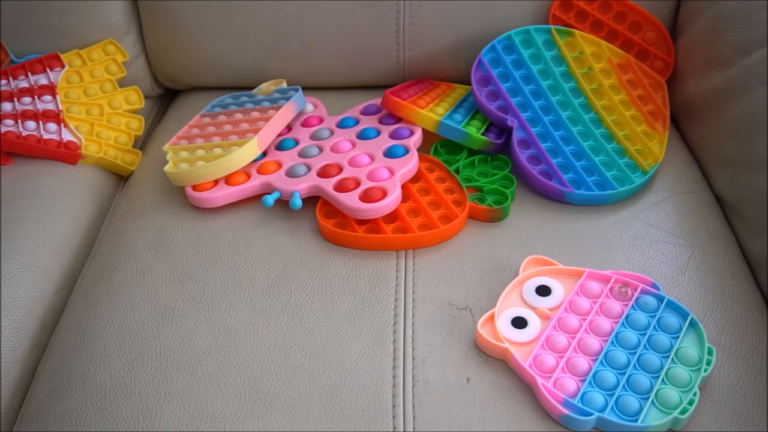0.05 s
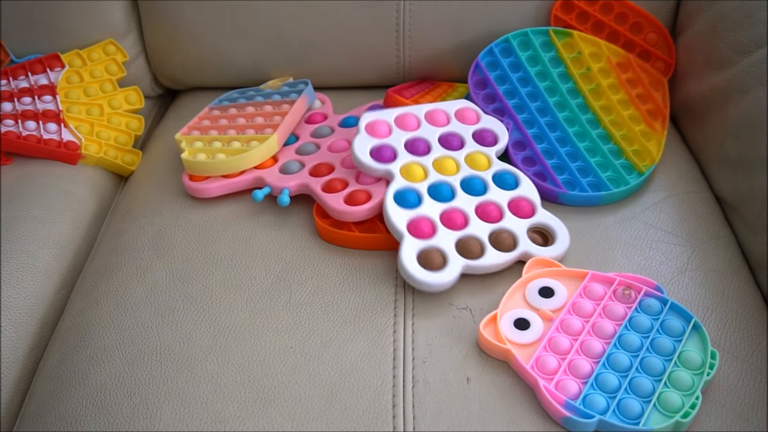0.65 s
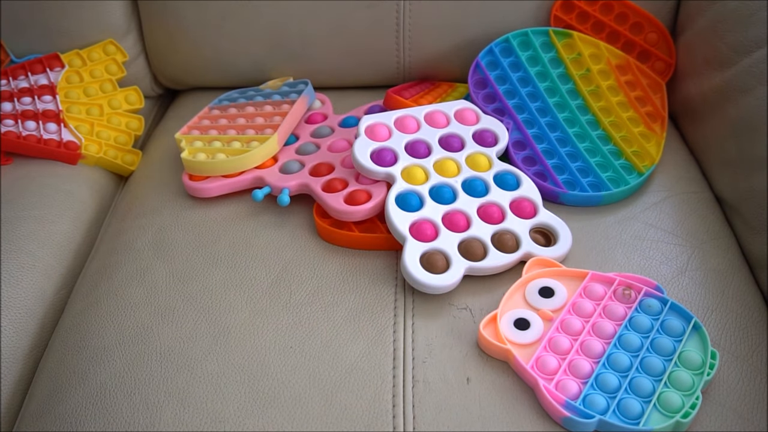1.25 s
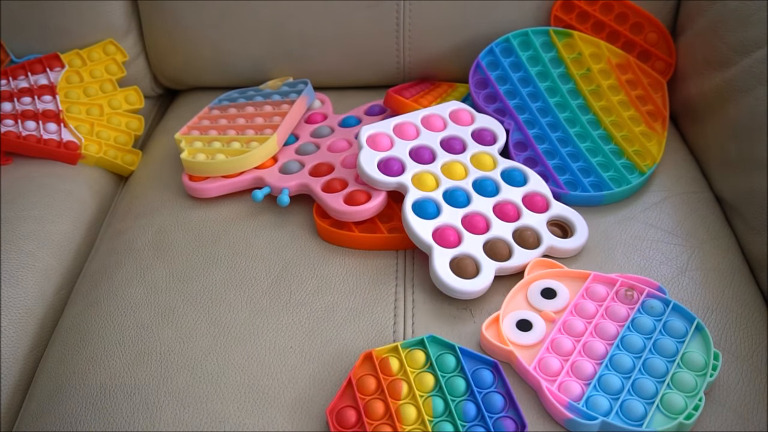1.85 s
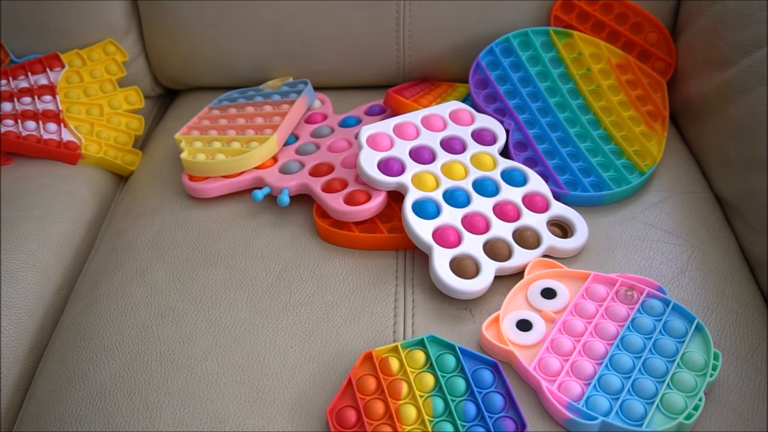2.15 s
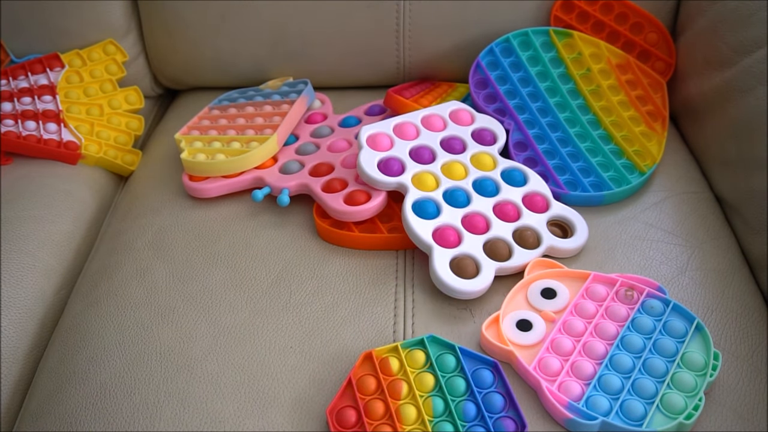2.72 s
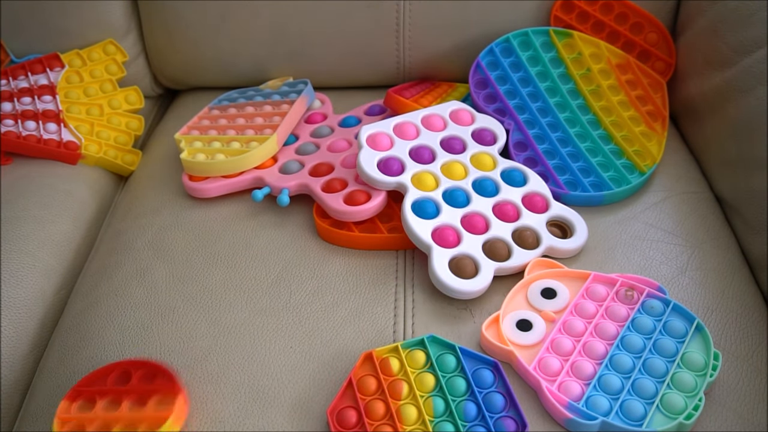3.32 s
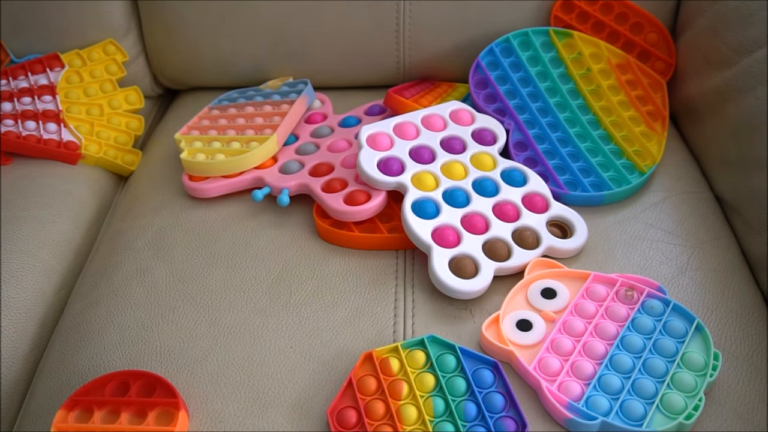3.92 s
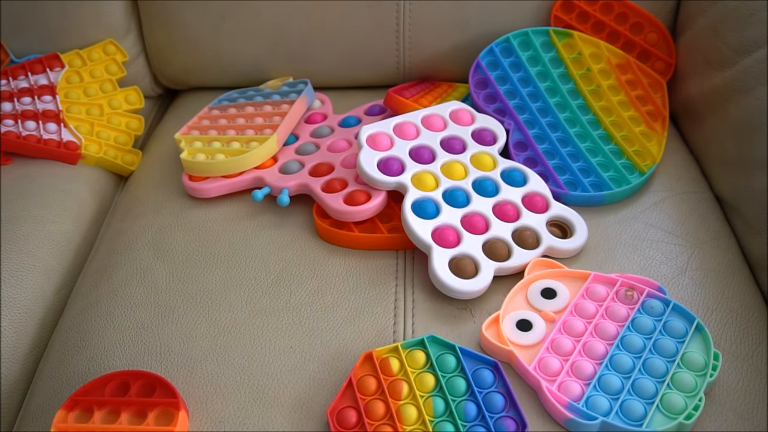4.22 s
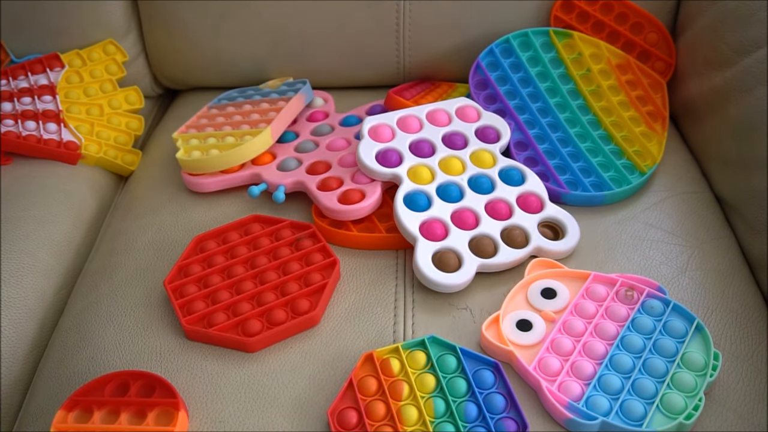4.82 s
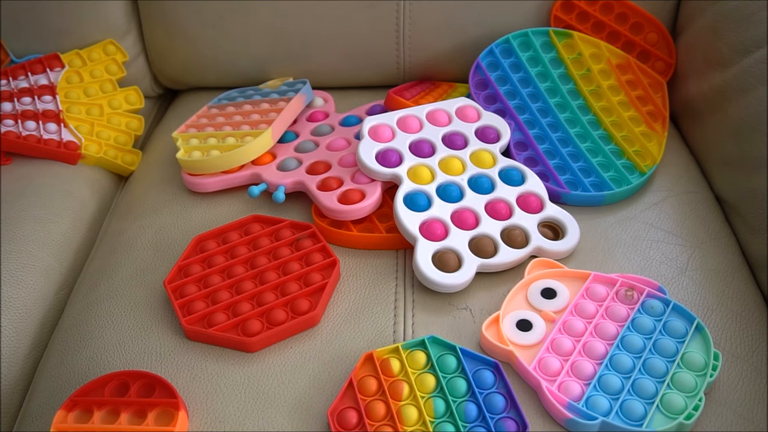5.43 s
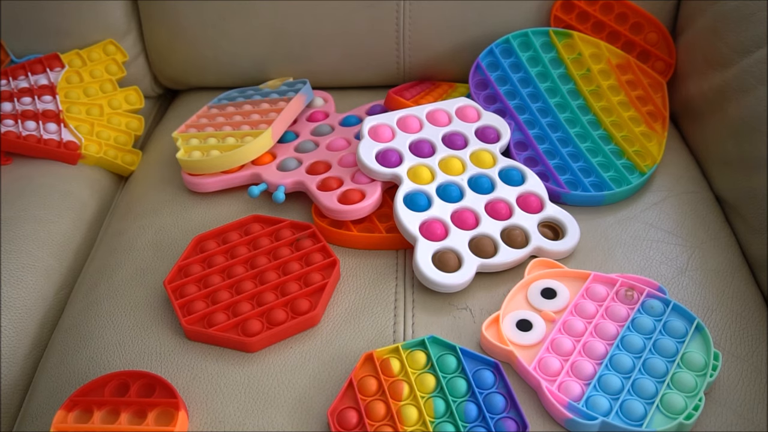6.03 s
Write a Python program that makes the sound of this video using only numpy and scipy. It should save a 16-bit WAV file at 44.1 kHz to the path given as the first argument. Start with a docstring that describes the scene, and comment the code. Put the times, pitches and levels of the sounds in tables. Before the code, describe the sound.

Rubbery toys slap and thunk onto a leather cushion four times, each with a small bounce, in a slightly ringing, faintly humming room.

```python
"""A bare, ringing room hums faintly. A silicone bubble toy drops onto a leather sofa: it lands edge
first, its hard frame clacking, flops flat and bounces. Three softer toys follow in turn, each impact
exciting the padding, the hollow body, the skin and the rim. After the second drop, and again after
the last, the next toy is handled further off, with soft taps and stick-slip rustles and creaks.
Throughout, a limiter holds down the loudest blows."""
import sys
import numpy as np
from scipy import signal
from scipy.fft import rfft, irfft, next_fast_len
from scipy.io import wavfile
from scipy.ndimage import uniform_filter1d

SR = 44100
rng = np.random.default_rng(int(sys.argv[2]) if len(sys.argv) > 2 else 0)


def waveform_to_disk(signal):
    """Save audio, clipped to [-1, 1], as 16-bit WAV at the path in sys.argv[1]."""
    frames = np.transpose(np.atleast_2d(signal))
    scaled = np.clip(frames, -1, 1) * 32767
    samples = np.round(scaled).astype(np.int16)
    wavfile.write(sys.argv[1], SR, samples)


N = 272097
TIME = np.arange(N) / SR

# Each toy: (in play from [s], hardness [0-1], thud decay [cycles], seat level [dB], knock Q [-],
# bob frequency [Hz], bob level [dB], slap pitch [ratio], its fall [octaves/s], level to the walls [dB])
TOYS = [ (0, 0.5, 12.8, 0.5, 1.87, 74.4, -8.5, 1.16, 0.12, -6),
        (1.1, 0.26, 5.2, 3, 0.96, 131, -17, 0.9, 0.1, -5),
        (1.9, 0.24, 3.05, 1.5, 1.1, 75, -16.5, 0.95, 0.23, -1.5),
        (4.0, 0.31, 8.8, 0.5, 1.26, 120, -9.5, 1.05, 1.73, -5.5),
        (4.95, 0.15, 6.4, -1, 1.4, 110, -25, 0.82, 0, -1), ]
# Contacts with the sofa; thud, slap and rim are relative to the knock: (time [s], knock level [dB],
# thud [dB], slap [dB], rim [dB], thud frequency [Hz], knock frequency [Hz], contact time [s])
IMPACTS = [ (0.2850, -13, -17, -10, -21, 240, 730, 0.0051),
           (0.2917, -4.5, 4.5, -1, -14, 224.6, 1160, 0.0023), (0.2960, -9.5, 5, -13, -33, 242, 760, 0.0057),
           (0.3229, -9.5, -9, -5, 2.5, 130, 1170, 0.002), (0.4820, -19, 3, 2, 1.5, 315, 1280, .0016),
           (0.4897, -17, -3, -2.5, -14, 133, 1050, 0.0031), (0.708, -24.5, 4, -2.5, -6, 240, 1280, 0.0026),
           (0.7161, -27, 4.5, -6.5, -12, 136, 1020, 0.0036), (1.5087, -22.5, 11, -4, -11, 162, 417, 0.0026),
           (1.5162, -14, -3, -8.5, -14, 248, 795, 0.0045), (1.5285, -22.5, -13, 0, -9.5, 265, 670, 0.008),
           (1.5405, -16, 10, -0.5, -8.5, 240, 620, .0027), (1.6689, -26.5, -22, -29, -23, 250, 960, 0.0025),
           (1.6780, -17.5, 0.5, -25, -19, 262, 890, 0.0044),
           (1.6990, -32.5, 16.5, -20, -13, 116, 610, .0011),
           (3.1212, -20.5, 9, 5.5, -9.5, 147, 440, 0.0055), (3.136, -14, 10, 4, -6.5, 230.8, 486, 0.0026),
           (3.3924, -23.5, 2, 3.5, -22, 187, 620, .0028), (3.3946, -33.5, 7.5, 17, -26, 316, 1400, .001),
           (3.4703, -24.5, 1.5, -8, -40, 159, 630, 0.0064), (4.3445, -18.5, -2, -1.5, -8, 334, 1230, .011),
           (4.3550, -24, 14, -18, -5.5, 221, 700, 0.0014), (4.3760, -17, 13.5, -12.5, -30, 167, 920, .0022),
           (4.419, -20.5, 7, -2.5, -11, 240, 950, 0.003), (4.6748, -33.5, 0, -22, -22, 200, 780, .0043),
           (4.6900, -21, 0.5, -9, -20, 153, 790, 0.018), (4.7044, -17.5, 2.5, -1, -22.5, 176, 860, .0015),
           (4.7760, -28, 11, -31, -22, 189, 810, 0.0018), ]
# Finger taps; thud and brightness are relative to the knock:
# (time [s], knock level [dB], thud [dB], brightness [dB], knock frequency [Hz], contact time [s])
FINGER_TAPS = [ (1.973, -43, -13, -1, 1000, .012), (2.094, -43, -8, -1, 677, .008),
               (2.235, -35.5, -5, -12, 575, 0.0066), (2.371, -35.5, -28, -20, 900, 0.015),
               (2.430, -39, -16, -11, 1150, 0.0099), (2.525, -41.5, -1.5, -5.5, 660, 0.0048),
               (2.856, -55.5, -9, 2, 900, .005), (5.04, -42.5, -8, -12, 1360, .012),
               (5.092, -42.5, 3.5, -17, 566, 0.0034), (5.397, -39.5, -15, -18, 715, 0.0033),
               (5.46, -36, -23, -11, 815, .0045), (5.475, -28.5, -17, -10, 730, .012),
               (5.627, -37, -10, -12, 1090, 0.0068), (5.833, -41.5, 3, -3, 725, 0.007),
               (5.853, -37, -10, -13, 836, 0.0064), (5.896, -41.5, -5, -13, 920, 0.0022),
               (5.944, -35.5, -21, -3, 950, .002), ]
# Creaks as a finger lets go of the silicone: (time [s], level [dB], pitch [Hz])
CREAKS = [(1.975, -49, 6150), (2.093, -48, 8900), (2.146, -53, 5500), (2.524, -49, 3700),
          (2.805, -54, 4600), (2.853, -55, 4400), (5.113, -53, 5600), (5.943, -45, 3610)]
# Silicone sliding in the hand: (start [s], length [s], level [dB], tilt [dB/octave], squeak [Hz])
STROKES = [ (2.109, 0.066, -51.5, 2.5, 5640), (2.363, 0.077, -50, 0.8, 1030), (2.777, 0.025, -54, 0, 4570),
           (5.081, 0.04, -55, 2.2, 5600), (5.298, 0.14, -53.5, 1.1, 5800), (5.45, 0.28, -50, 0, 1260),
           (5.801, 0.33, -53.5, 1, 1010), ]

# Modes of the seat and of a toy's bubble sheet: (frequency [Hz], level [dB], T60 [s])
SEAT_MODES = [(38.4, -20.5, 0.96), (69, -31, 0.81), (110, -23, 0.36), (240, -25, 0.21)]
SHEET_MODES = [(338, -8, 0.15), (413.6, -7, 0.13), (528, -16, 0.2), (647, -20, 0.31), (760, -29, 0.32),
               (920, -59, 0.19), (1078, -27, 0.42), (1170, -21, 0.37), (1312, -23, 0.37), (1697, -20, 0.17)]
# Spectra: (frequency [Hz], level [dB])
SLAP_SPECTRUM = [(300, -24.5), (1000, -5.5), (1600, 7.5), (2300, 7), (3400, 4), (4300, -2), (5200, -9.5),
                 (7000, -29), (10000, -40), (16000, -50)]  # flat rubber on leather
HARD_RIM_SPECTRUM = [(1500, -22), (4000, -13), (5200, -20), (6800, -12.5), (8500, 11.5), (9600, 13.5),
                     (10800, 18.5), (13000, 14), (15500, 8.5)]  # the click of a hard frame
SOFT_RIM_SPECTRUM = [(1500, -31), (3500, 1.5), (5200, 7), (6800, -2), (9000, -18), (12000, -22),
                     (15500, -21)]  # the swish of a silicone edge
RUB_SPECTRUM = [(200, 4.5), (600, -1), (1200, 0), (2200, -3), (3500, -9), (6000, -11.5), (10000, -15.5),
                (16000, -18.5)]  # silicone against the hand
REVERB_SPECTRUM = [(20, 3), (38, -4.5), (70, -4.5), (150, -0.5), (300, 1), (600, -3), (1200, -1.5),
                   (3000, -0.5), (7000, -1), (15000, 2.5)]  # the room's reflections
AIR_SPECTRUM = [(15, -26.5), (25, -14), (123, -8.5), (157, -20.5), (249, -3.5), (270, -12), (416, -17),
                (489, -14.5), (575, -16.5), (988, -20.5), (1070, -20.5), (1890, -24.5), (3520, -29.5),
                (5000, -31.5), (16000, -37.5)]  # steady room air
# Reverberation time of the room: (frequency [Hz], T60 [s])
REVERB_T60 = [(50, 0.97), (160, 0.28), (420, 0.68), (1200, 0.62), (3000, 0.66), (8000, 0.61), (15000, 0.25)]
# Likeness of left and right in the reflections and in the air: (frequency [Hz], coherence [-])
REVERB_COHERENCE = [(100, 1), (300, 1), (700, 0.9), (1400, 0.75), (3000, 0.47), (7000, 0.075),
                    (15000, 0.098)]
AIR_COHERENCE = [(60, 0.97), (130, 0.81), (290, 0.59), (640, 0), (1410, -0.0), (3100, 0), (6820, 0.17),
                 (15000, 0.2)]
# The room's hum: (frequency [Hz], half-width [Hz], level [dB])
HUM = (280, 4.2, -63.5)


def toys(paths=3):
    """Superposition: impacts, taps and creaks at different spots reach the walls by different paths."""
    direct, to_walls = np.zeros((2, N)), np.zeros((paths, 2, N))
    events = [sofa_impact(*row) for row in IMPACTS]
    events += [finger_tap(*row) for row in FINGER_TAPS]
    events += [creak(*row) for row in CREAKS]
    for k, (start, near, walls) in enumerate(events):
        add(direct, start, near)
        add(to_walls[k % paths], start, walls)
    return direct + sum(reverberation(x) for x in to_walls)


def sofa_impact(start, db, *contact, landing_ring_db=10, landing_s=0.15):
    """Impact and rebound: the landing rings in the room more than later bounces, whose slap is duller."""
    toy = toy_at(start)
    in_play_from, hardness, *_, pitch, octaves_per_s, walls_db = toy
    since_landing = start - min(row[0] for row in IMPACTS if row[0] >= in_play_from)
    landing_ring = np.exp(-(since_landing / landing_s) ** 2)
    near, walls = blow(toy, *contact, pitch * 2 ** (-octaves_per_s * since_landing))
    return start, amp(db) * near, amp(db + walls_db + landing_ring_db * hardness * landing_ring) * walls


def blow(toy, thud_db, slap_db, rim_db, thud_hz, knock_hz, contact_s, pitch, size=2048):
    """Impact excitation: the padding thuds, the hollow toy knocks, its skin slaps and its rim clicks."""
    _, hardness, _, _, knock_q, *_ = toy
    t, hz = np.arange(SR) / SR, bins(size) + 1
    near = np.tile(amp(thud_db) * thud(t, thud_hz, toy), (2, 1))
    # sheet modes near the knock ring most
    modes = [(f, db + hollow_db(f, knock_hz, knock_q), t60) for f, db, t60 in SHEET_MODES]
    add(near, 0, damped_modes(t[:SR // 4], modes)[None])
    walls = near.copy()
    knock = hollow_db(hz, knock_hz, knock_q)
    slap = read(SLAP_SPECTRUM, hz / pitch)
    rim = hardness * read(HARD_RIM_SPECTRUM, hz) + (1 - hardness) * read(SOFT_RIM_SPECTRUM, hz)
    impulse = signal.unit_impulse(size)[None]
    for k, (gain, spectrum) in enumerate([(1, knock), (amp(slap_db), slap), (amp(rim_db), rim)]):
        add(near, 0, gain * fixed_energy(coloured(patter(t[:size], contact_s), spectrum)))
        # summed over all directions the patter evens out to a smooth spectrum
        add(walls, k * contact_s, gain * fixed_energy(coloured(impulse, spectrum)))
    return near, walls


def thud(t, hz, toy, overtone=1.694, overtone_db=-3, stiff_db=-14, bob_t60=0.12, low_cut_hz=50):
    """Damped oscillation: the toy's weight swings the padding, bobs on it and stirs the seat's modes."""
    _, hardness, cycles, seat_db, _, bob_hz, bob_db, *_ = toy
    flex_db = overtone_db + stiff_db * hardness  # a hard frame swings as one piece, a soft one flexes
    t60 = cycles / hz
    modes = [(hz, 0, t60), (hz * overtone, flex_db, t60 / overtone), (bob_hz, bob_db, bob_t60)]
    motion = damped_modes(t, modes) + amp(seat_db) * damped_modes(t, SEAT_MODES)
    low_cut = signal.butter(4, low_cut_hz, "high", fs=SR, output="sos")  # motion below about 50 Hz is cut away, thinning even the seat's deepest sway
    return fixed_energy(signal.sosfilt(low_cut, motion))


def hollow_db(hz, knock_hz, q, soft_hz=3000):
    """Resonance of the hollow toy, in dB: one broad peak, its treble damped by the rubber."""
    detuning = q * (hz / knock_hz - knock_hz / hz)
    return -20 * np.log10((1 + detuning ** 2 / 2) * np.hypot(1, (hz / soft_hz) ** 2))


def patter(t, contact_s, snap=0.28, width=0.24, flattening=0.043, give=0.21):
    """Distributed contact: a snap, an instant of give, then a dying patter as the surfaces meet."""
    mid, side = rng.standard_normal((2, len(t)))
    envelope = np.exp(-t / contact_s) * (1 - np.exp(-t / (give * contact_s)))
    touches = (mid + width * np.array([side, -side])) * envelope
    spectrum = rfft(touches / np.linalg.norm(touches[0]) + snap * (t == 0))
    spectrum /= (abs(spectrum) + 1e-9) ** flattening  # chance peaks are slightly evened out
    return irfft(spectrum) * np.exp(-t / (10 * contact_s))


def finger_tap(start, db, thud_db, bright_db, knock_hz, contact_s, thud_hz=247, rim_db=-8.5):
    """Light impact: fingers knock the toy they hold; slap and rim brighten together."""
    toy = toy_at(start)
    *_, pitch, _, walls_db = toy
    near, walls = blow(toy, thud_db, bright_db, bright_db + rim_db, thud_hz, knock_hz, contact_s, pitch)
    return start, amp(db) * near, amp(db + walls_db - 0.5) * walls  # the hand shields the walls a little


def creak(start, db, pitch_hz, decay_s=0.008, width_octaves=0.074, walls_db=-3.5, size=4096):
    """Stick-slip excitation: a brief patter of slips rings one narrow resonance."""
    octaves = np.log2((bins(size) + 1) / pitch_hz)
    peak_db = -20 * np.log10(1 + (octaves / width_octaves) ** 2)
    slips = patter(np.arange(size) / SR, decay_s)
    near = amp(db) * fixed_energy(coloured(slips, peak_db))
    return start, near, amp(walls_db) * near


def rubbing(rise_s=0.022, fade_s=0.18, squeak_db=5, squeak_octaves=0.16, grain_db=0.2):
    """Sliding friction: silicone sticks and slips in the hand, a faint rustle with a trace of squeak."""
    out, t, hz = np.zeros((2, N)), np.arange(SR) / SR, bins(size=2048) + 1
    for start, length, db, tilt_db, squeak_hz in STROKES:
        squeak = squeak_db * np.exp(-(np.log2(hz / squeak_hz) / squeak_octaves) ** 2)
        spectrum = np.transpose([hz, read(RUB_SPECTRUM, hz) + tilt_db * np.log2(hz) + squeak])
        slips = unit_rms(uniform_filter1d(rng.standard_normal(SR), size=260))
        swell = np.minimum(t / rise_s, 1) * np.exp(-np.maximum(t - length, 0) / fade_s)
        rustle = unit_rms(stereo_noise(SR, spectrum, REVERB_COHERENCE))
        add(out, start, amp(db + grain_db * slips) * swell * rustle)
    return out


def reverberation(x, wall_delay_s=0.0059, early_db=-7, wall_db=-19):
    """Reflection and absorption: after the first echoes, each band decays at its own rate."""
    noise = stereo_noise(3 * SR // 2, REVERB_SPECTRUM, REVERB_COHERENCE)
    hz, t, bands = signal.stft(noise, SR, nperseg=512)
    decay = amp(-60 * t / read(REVERB_T60, hz)[:, None])
    response = signal.istft(bands * decay, SR, nperseg=512)[1]
    first_echo = round(wall_delay_s * SR)
    response[:, :first_echo] *= amp(early_db)  # sofa and floor scatter first
    response /= np.linalg.norm(response[0])
    response[:, first_echo] += amp(wall_db)  # the nearest wall answers
    return signal.fftconvolve(x.mean(0)[None], response, axes=1)[:, :N]


def air_and_hum(air_db=-50.5):
    """Stationary noise: broadband room air, and a band so narrow that it is heard as a wavering hum."""
    hum_hz, width_hz, hum_db = HUM
    size = next_fast_len(N)
    peak = 1 / (1 + ((bins(size) - hum_hz) / width_hz) ** 2)
    hum = irfft(rfft(rng.standard_normal(size)) * peak)[:N]
    air = stereo_noise(N, AIR_SPECTRUM, AIR_COHERENCE)
    return amp(air_db) * unit_rms(air) + amp(hum_db) * unit_rms(hum)


def damped_modes(t, modes):
    """Free vibration: a sum of exponentially decaying sines."""
    return sum(amp(db - 60 * t / t60) * np.sin(2 * np.pi * hz * t) for hz, db, t60 in modes)


def coloured(x, db):
    """Minimum-phase filtering to a gain for each bin: nothing sounds before its cause."""
    log_gain = np.log(amp(np.maximum(db, -100)))
    phase = -signal.hilbert(np.r_[log_gain, log_gain[-2:0:-1]]).imag[:len(db)]
    return irfft(rfft(x) * np.exp(log_gain + 1j * phase))


def stereo_noise(size, spectrum, coherence):
    """Partial coherence: independent mid and side noises mix to set how alike the ears are."""
    padded = next_fast_len(size)
    hz = bins(padded)
    mid, side = rfft(rng.standard_normal((2, padded)))
    alike = np.clip(read(coherence, hz), -1, 1)
    mid, side = mid * np.sqrt((1 + alike) / 2), side * np.sqrt((1 - alike) / 2)
    return irfft(np.array([mid + side, mid - side]) * amp(read(spectrum, hz)), padded)[:, :size]


def toy_at(seconds):
    """The toy in play at that time."""
    return [toy for toy in TOYS if toy[0] <= seconds][-1]


def amp(db):
    """Decibels to amplitude ratio."""
    return 10 ** (np.asarray(db) / 20)


def unit_rms(x):
    """Power normalisation to rms 1."""
    return x / np.sqrt(np.mean(x ** 2) + 1e-20)


def fixed_energy(x):
    """Energy normalisation to that of 5 ms at rms 1."""
    return unit_rms(x) * np.sqrt(0.005 * SR / x.shape[-1])


def read(points, hz):
    """Interpolation of a table on a log-frequency axis."""
    table_hz, values = np.transpose(points)
    return np.interp(np.log(hz + 1), np.log(table_hz + 1), values)


def bins(size):
    """Fourier frequencies, in Hz, of that many samples."""
    return np.fft.rfftfreq(size, 1 / SR)


def add(mix, start, sound):
    """Superposition of a sound on the mix from start seconds."""
    part = mix[:, round(start * SR):][:, :sound.shape[1]]
    part += sound[:, :part.shape[1]]


def scene():
    """Sound pressures add: toys, handling and room."""
    return toys() + rubbing() + air_and_hum()


def record(dry, limit_db=-7.5, recovery_db_per_s=50, cutoff_hz=16000):
    """Limiting: the gain ducks at once and recovers slowly, holding the room's ring up; then a low-pass."""
    power_db = 10 * np.log10(abs(uniform_filter1d((dry ** 2).mean(0), size=64)) + 1e-12)
    recovery_db = TIME * recovery_db_per_s
    peak_db = np.maximum.accumulate(power_db + recovery_db) - recovery_db
    duck_db = uniform_filter1d(np.maximum(peak_db - limit_db, 0), size=32)
    limited = np.clip(dry * amp(-duck_db), -1, 1)
    lowpass = signal.firwin(301, cutoff_hz, window=("kaiser", 9), fs=SR)
    return signal.oaconvolve(limited, lowpass[None], "same")


dry = scene()
out = record(dry)
waveform_to_disk(out)
```